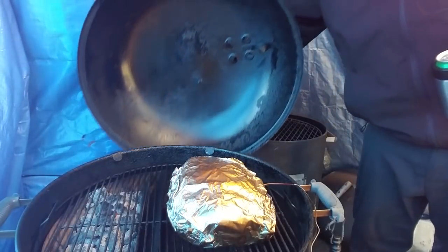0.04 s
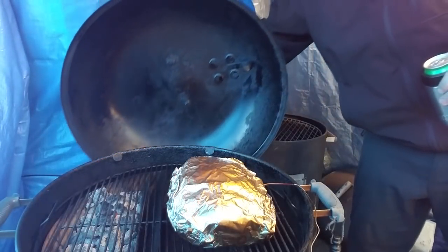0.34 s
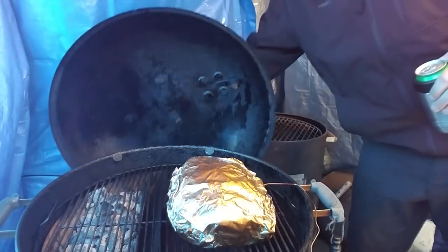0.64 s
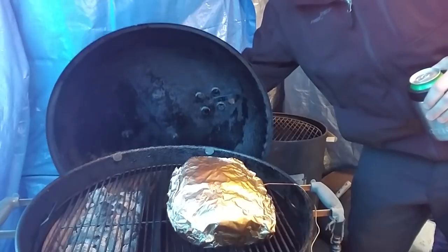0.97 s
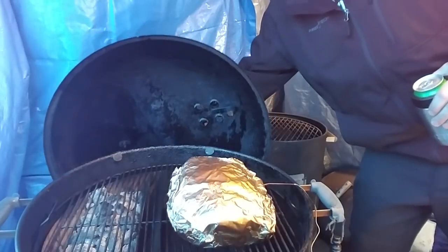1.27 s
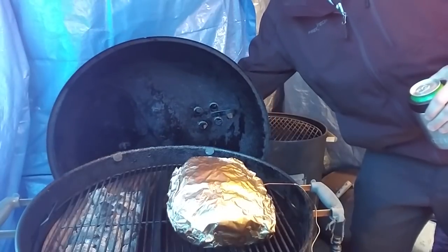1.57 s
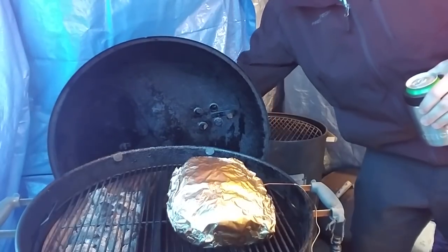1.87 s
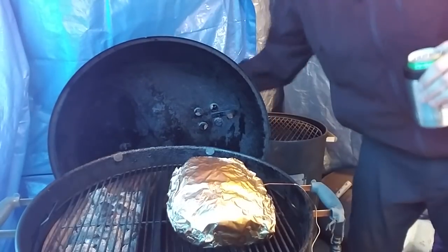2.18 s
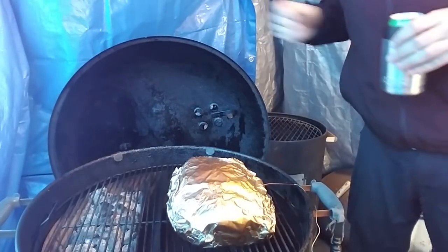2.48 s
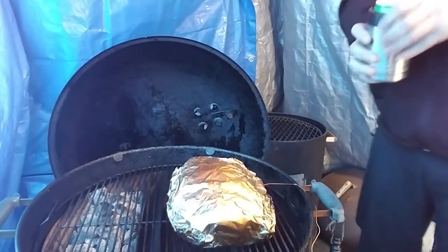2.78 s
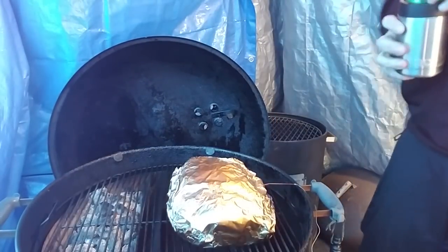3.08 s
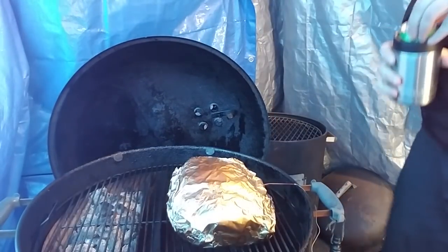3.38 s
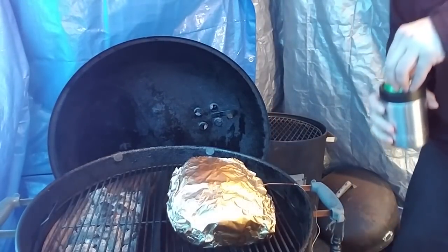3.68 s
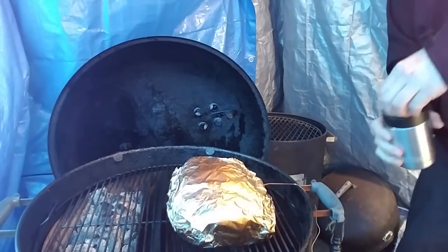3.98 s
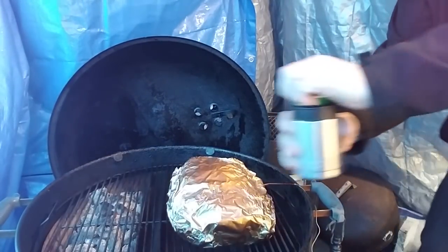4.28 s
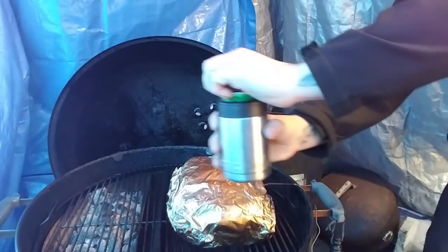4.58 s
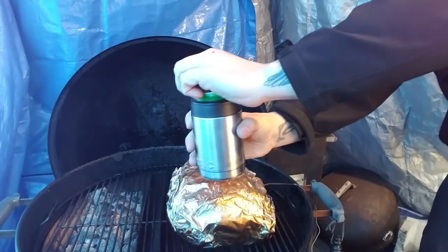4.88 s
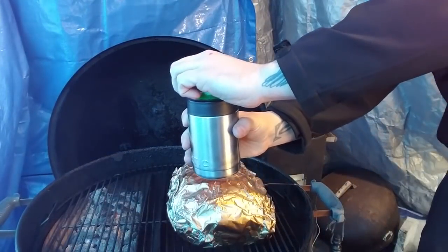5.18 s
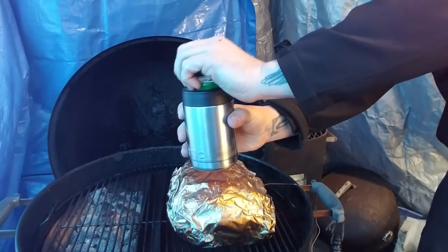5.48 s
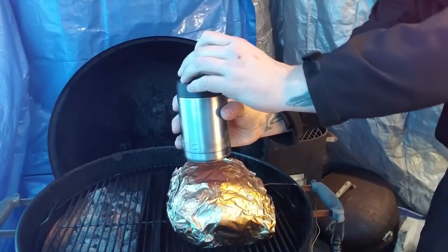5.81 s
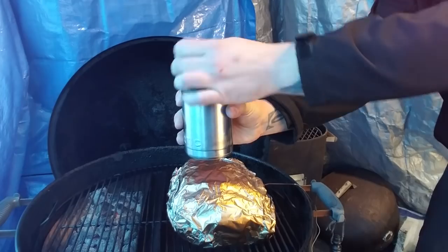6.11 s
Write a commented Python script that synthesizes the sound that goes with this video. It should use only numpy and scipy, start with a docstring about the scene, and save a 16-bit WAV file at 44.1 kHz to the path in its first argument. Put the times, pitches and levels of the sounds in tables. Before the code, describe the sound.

A low, distant outdoor rumble runs quietly throughout. At about 0.2 seconds a steel grill lid touches the rim of its bowl with a light ringing knock. From 0.6 to 1.6 seconds it clanks several times close by, with small rebounds and short metallic rings, the heaviest thump near 1.2 seconds, and settles with a soft knock at 1.9. Jacket sleeves swish softly, most noticeably around 2.5 and from 4 to 4.5 seconds. A tiny squeak comes near 3 seconds, a finger tick on a drink can at 3.4, and a very faint thin squeak just before 5. At 5.1 seconds the can's tab breaks the seal with sharp cracks and a spit of gas, and at 5.25 the flap pops in, the loudest sound. The rumble dips for a moment afterwards, and a few faint finger taps on the can follow until about 6 seconds.

```python
"""Under a tarpaulin shelter, over a low outdoor rumble, a steel kettle-grill lid is hooked onto the
rim of its bowl, knocking and ringing. Jacket sleeves swish as a drink can is brought close, with light
finger ticks and two faint squeaks. About five seconds in, the tab cracks the seal, gas spits out and
the flap pops in. The pop drives a limiter, which ducks the rumble and the last touches for a moment."""
import sys
import numpy as np
from scipy import signal
from scipy.fft import rfft, irfft, next_fast_len
from scipy.io import wavfile
from scipy.ndimage import uniform_filter1d, minimum_filter1d

SR = 44100
rng = np.random.default_rng(int(sys.argv[2]) if len(sys.argv) > 2 else 0)


def wav_out(sig):
    """Save sig, one row per channel (or a flat mono array), as 16-bit PCM at SR to the path in sys.argv[1]."""
    wavfile.write(sys.argv[1], SR, np.round(np.clip(np.atleast_2d(sig).T, -1, 1) * 32767).astype(np.int16))


N = 271170

# The can's aluminium top, damped by the hand. Each row: mode in Hz, level in dB, base t60 in seconds.
CAN_TOP_MODES = [(1100, -9.5, 0.06), (1773, -6.5, 0.048), (2057, -1.5, 0.025), (2390, -0.5, 0.016),
                 (3300, -1.5, .006), (4160, 11.5, 0.0042), (4640, 1.5, 0.0086), (5040, 7, 0.012),
                 (6340, -5, 0.017), (7300, -15, .02), (10400, -12.5, 0.024), (13400, -13.5, 0.011)]
# The colour of rubbing cloth. Each row: frequency in Hz, level in dB.
CLOTH_SPECTRUM = [(200, -11.5), (600, 1), (1300, 0.5), (2800, 1), (4500, -3.5), (7600, -4), (9200, -12.5),
                  (11000, -8), (13500, -4), (15800, -3.5)]
FLAP_IN_S = 5.2494  # the can's flap pops in


def amp(db):
    """Turns dB into gain."""
    return 10 ** (np.asarray(db) / 20)


def unit(x):
    """Scales to rms 1."""
    return x / np.sqrt(np.mean(x ** 2) + 1e-20)


def curve(points, hz):
    """Joins points on a log-frequency axis."""
    f, value = np.transpose(points)
    return np.interp(np.log(hz + 1), np.log(f + 1), value)


def add(mix, s, sound):
    """Mixes a sound in at s seconds."""
    part = mix[:, round(s * SR):][:, :sound.shape[-1]]
    part += sound[..., :part.shape[1]]


def shelf(hz, corner_hz):
    """Goes from 0 below the corner to 1 above it."""
    return hz ** 3 / (hz ** 3 + corner_hz ** 3)


def fade(t, t60):
    """Dies by 60 dB in t60 seconds."""
    return np.exp(-np.log(1000) * t / np.maximum(t60, 1e-3))


def wander(seconds):
    """Smooth random drift of rms 1 that changes over the given time."""
    size = max(int(seconds * SR), 2)
    return unit(uniform_filter1d(uniform_filter1d(rng.standard_normal(N), size), size))


def noise(colour_db, size):
    """Coloured stereo noise of rms 1, centred in the bass and wide above."""
    # Stereo width. Each row: frequency in Hz, left-right correlation.
    correlation = [(60, 0.98), (200, 0.92), (380, 0.693), (700, 0), (1300, 0), (2400, 0.02), (15000, 0)]
    hz = np.fft.rfftfreq(size, 1 / SR)
    left, other = rfft(rng.standard_normal((2, size)))
    shared = curve(correlation, hz)
    right = shared * left + np.sqrt(1 - shared ** 2) * other
    return unit(irfft(np.array([left, right]) * amp(colour_db(hz)), size))


def ring(modes, t, gain_db, decay, scatter):
    """Struck modes: decay scales their ring times, scatter spreads the higher ones' phase in stereo."""
    hz, db, t60 = np.transpose(modes)
    phase = scatter * np.minimum(hz / 1200, 1) * rng.uniform(-np.pi, np.pi, (2, len(modes)))
    waves = fade(t, decay * t60[:, None]) * np.exp(2j * np.pi * hz[:, None] * t)
    return ((amp(db + gain_db) * np.exp(1j * phase)) @ waves).imag


def favour(modes, centre_hz, octaves, depth_db):
    """Gain of each mode in dB: those far from the struck register lose up to depth_db."""
    octaves_off = np.log2((np.array(modes)[:, 0] + 1) / centre_hz)
    return depth_db * (np.exp(-(octaves_off / octaves) ** 2) - 1)


def clusters(hz):
    """Random peaks and gaps in dB: each contact point wakes other clusters of modes."""
    grid_hz = np.arange(0, SR / 2, 48)
    bumps_db = 6 * np.clip(rng.standard_normal(len(grid_hz)), -2.5, 1.1)
    return np.interp(hz, grid_hz, bumps_db) * (.4 + .6 * shelf(hz, 700))


def partials(hz, gap_hz=85.24, width_hz=6.4, height_db=7.5):
    """Narrow peaks in dB at random frequencies: the lid's many short-lived modes."""
    centres = np.cumsum(gap_hz * rng.uniform(.3, 1.7, 600))
    above = np.clip(np.searchsorted(centres, hz), 1, len(centres) - 1)
    off_hz = np.minimum(abs(hz - centres[above - 1]), abs(hz - centres[above]))
    return 10 * np.log10(1 + amp(height_db) ** 2 * np.exp(-(off_hz / width_hz) ** 2))


def outdoors():
    """A bed of distant rumble with a drone at 117 Hz."""
    # The rumble's colour. Each row: frequency in Hz, level in dB.
    spectrum = [(12, -48), (20, -15.5), (49, -8.5), (112, 0), (207, -14.5), (245, -13.5), (478, -12.5),
                (614, -21), (788, -20), (2210, -34), (3080, -39), (3350, -43.5), (7520, -53.5),
                (8880, -53.5), (15500, -40)]
    rumble = noise(lambda f: curve(spectrum, f) - 3 * shelf(f, 4000), N)
    rumble *= amp(-45.5 + .4 * wander(0.053))
    drone = noise(lambda f: -20 * np.log10(1 + ((f - 117) / 11) ** 2), N)
    return rumble + amp(-54.5) * drone


def sleeves():
    """Fine woven cloth slides on itself, catching slightly; each arm movement swells and dies away."""
    # Arm movements. Each row: peak time in seconds, level in dB, rise and fall in seconds.
    swishes = [(.55, -52, .42, 0.3), (1.38, -52, 0.24, 0.58), (2.31, -58, 0.12, 0.3),
               (2.55, -47.5, 0.065, 0.19), (2.9, -60, .2, 0.46), (3.357, -47, 0.024, .04),
               (3.54, -61, 0.088, 0.17), (4.0, -53, 0.12, 0.29), (4.33, -49.5, 0.29, 0.32),
               (5.68, -61.5, 0.16, 0.093), (6.0, -55.5, 0.069, 0.12)]
    t = np.arange(N) / SR
    swells = sum(amp(db) * np.exp(-((t - s) / np.where(t < s, rise, fall)) ** 2)
                 for s, db, rise, fall in swishes)
    stir, catching = amp(-65), amp(0.94 * wander(0.021))
    return (stir + swells) * catching * noise(lambda f: curve(CLOTH_SPECTRUM, f), N)


def squeaks():
    """Faint, thin tones of wavering pitch that swell and fade."""
    # Each row: start and length in seconds, pitch in Hz, level in dB.
    tones = [(2.954, 0.025, 4430, -55.5), (4.6, 0.52, 3145, -69)]
    out = np.zeros((2, N))
    for s, length, hz, db in tones:
        size = int(length * SR)
        cycles = np.cumsum(hz * (1 + 0.0068 * wander(.003)[:size])) / SR
        flutter = amp(3 * wander(0.013)[:size])
        add(out, s, amp(db) * np.sin(2 * np.pi * cycles) * np.hanning(size) * flutter)
    return out


def fingers():
    """Light scuffs with a faint metal ring: nails are bright and sudden, fingertips dull and slow."""
    # Finger scuffs and ticks on the grill lid, then on the can's sleeve and tab.
    # Each row: start in seconds, level in dB, treble in dB.
    touches = [(0.429, -42, -10.5), (0.507, -43.5, 3), (3.364, -33, 4.5), (3.6, -45.5, 21),
               (5.386, -38.5, -15), (5.394, -33.5, 26), (5.411, -35.5, -12), (5.586, -48, -21),
               (5.748, -50, 12), (5.964, -40, -6), (6.032, -47.5, -22), (6.07, -40, 8)]
    out, t = np.zeros((2, N)), np.arange(SR // 3) / SR
    for s, db, treble_db in touches:
        attack_s = 0.0016 * np.exp(-treble_db / 27)
        ring_db = 7 if s > FLAP_IN_S else -6  # the open can rings more
        scuff = noise(lambda f: curve(CLOTH_SPECTRUM, f) + clusters(f) / 2
                      - 5 * shelf(f, 7800) + treble_db * shelf(f, 4000), len(t))
        woken_db = favour(CAN_TOP_MODES, centre_hz=1600, octaves=0.73, depth_db=28)
        tick = ring(CAN_TOP_MODES, t, ring_db + woken_db, decay=1.1, scatter=0.27)
        add(out, s, amp(db) * np.minimum(t / attack_s, 1) * (fade(t, t60=0.13) * scuff + tick))
    return out


def knock(t, registers, bass_db, treble_db, attack_s, decay, ring_db):
    """One contact spreads through the steel shell as a short, dense clang and leaves a few modes singing."""
    # The lid's lasting modes. Each row: frequency in Hz, level in dB, base t60 in seconds.
    lid_modes = [(229.7, 0, 0.9), (383.8, 2, 0.34), (434, -9, 0.61), (625, -9, 1), (904, -11, 0.8),
                 (941, -6.5, 0.45), (967.6, -5, .55), (1112, 6, 0.13), (1238, -5, 0.65), (1417, -2, 0.213),
                 (1466, -1.5, 0.72), (1783, -5, 0.77), (1887, -4.5, 0.55), (1980, 4.5, 0.29),
                 (2010, 1.5, .22), (2110, -9, .25), (2175, -1.5, 0.25), (2260, -6.5, 0.22),
                 (2400, -15, 0.1), (2436, -12.5, 0.5), (2640, -18, 0.3), (2660, -4, 0.4), (2770, -16, 0.5),
                 (3055, 0.5, .19), (3160, 9, 0.17), (3330, 3.5, .12), (3500, -12, .25), (4020, -1, 0.17),
                 (5190, -10, 0.16)]
    # The colour of its crowded short modes. Each row: frequency in Hz, level in dB.
    clang_spectrum = [(53, -26), (90, -9.5), (200, -5), (290, -15), (400, -3.5), (600, -5.5), (800, -9.5),
                      (1300, -12), (1600, -16), (2000, -11.5), (3100, -8.5), (4200, -15), (9400, -31),
                      (15500, -28)]
    # Their tails. Each row: frequency in Hz, base t60 in seconds.
    clang_t60 = [(150, 0.52), (500, 0.21), (1400, 0.29), (3500, 0.24), (8000, 0.28), (15000, 0.19)]
    wash = noise(lambda f: curve(clang_spectrum, f)
                 + 0.87 * clusters(f) + (partials(f) - 3.5) * shelf(f, 430)
                 + bass_db * (1 - shelf(f, 900)) + treble_db * shelf(f, 6400), len(t))
    hz, age, bands = signal.stft(wash, SR, nperseg=256)
    bands *= fade(age, decay * curve(clang_t60, hz)[:, None])
    clang = signal.istft(bands, SR)[1][:, :len(t)]
    woken_db = np.maximum(*(favour(lid_modes, centre, octaves=0.21, depth_db=17) for centre in registers))
    singing = ring(lid_modes, t, ring_db + woken_db, decay, scatter=0.56)
    bloom = np.minimum(t / 0.0079, 1)  # the ring takes a moment to spread round the shell
    return np.minimum(t / attack_s, 1) * clang + bloom * singing


def lid():
    """The lid knocks on the rim, rebounds and thumps; the freer it hangs, the more it sings."""
    # Lid on rim. Each row: start in seconds, level in dB, treble in dB, attack in seconds, freedom from
    # 0 to 1, low and high favoured register in Hz, rebound delay in seconds (0 for none).
    knocks = [(0.153, -29, 14, 0.0021, 0.93, 1934, 2540, 0.012),
              (0.568, -20, 1, 0.0032, 0.17, 434, 3019, 0),
              (0.846, -14.5, 3, 0.0081, 0.077, 2215, 3160, 0.061),
              (1.058, -17.5, -3.5, 0.0069, 0.082, 398, 2410, 0.066),
              (1.179, -21, -1, 0.0092, 0.81, 430, 2350, 0.042),
              (1.238, -17, 7.5, 0.00145, 0.18, 467, 3970, 0.0029),
              (1.251, -16.5, -1, 0.0024, 0.26, 990, 2870, .067),
              (1.544, -18.5, -2, 0.0054, 0.19, 980, 2540, 0.091),
              (1.856, -36.5, -5, 0.005, 0.25, 435, 2150, 0.0048)]
    # Its weight landing. Each row: start in seconds, level in dB, pitch in Hz, rise in seconds.
    thumps = [(0.153, -21, 200, 0.0014), (0.76, -26.5, 154, 0.0013), (1.179, -6, 440, 0.0012),
              (1.239, -20, 469, 0.0039), (1.545, -20, 360, 0.0025), (1.86, -30, 179, 0.0043)]
    held_ring_db, free_ring_db = -8.5, 2.5
    out, t = np.zeros((2, N)), np.arange(36000) / SR
    for s, db, treble_db, attack_s, freedom, *registers, rebound_s in knocks:
        decay = np.interp(freedom, [0, 1], [0.7, 1.31])
        ring_db = np.interp(freedom, [0, 1], [held_ring_db, free_ring_db])
        bass_db = -4.5 - 1.17 * (db + 20.5)  # harder knocks tilt from the bass towards the mids
        add(out, s, amp(db) * knock(t, registers, bass_db, treble_db, attack_s, decay, ring_db))
        if rebound_s > 0:
            rebound = knock(t, registers, bass_db=5, treble_db=7.5, attack_s=0.0018,
                            decay=0.56, ring_db=held_ring_db)
            add(out, s + rebound_s, amp(db - 13.5) * rebound)
    for s, db, hz, rise in thumps:
        envelope = t / rise * np.exp(1 - t / rise)
        add(out, s, -amp(db) * envelope * np.sin(2 * np.pi * hz * t))
    return out


def can():
    """The scored top tears in jerks: each snaps the metal, trailed by spitting gas and near reflections."""
    # The top giving way. Each row: start in seconds, snap level in dB, snap centre in Hz.
    cracks = [(5.1128, -1, 3130), (5.1235, 9.5, 3450), (5.1351, 7, 1792), (5.143, 3, 4500),
              (5.1598, -4.5, 1950), (5.2194, -12.5, 2000), (5.2339, -17.5, 2200), (5.245, -8.5, 2600),
              (5.2492, 16.5, 1700), (5.2514, 10.5, 2200), (5.2618, 10, 2230)]
    # The spray's colour with the flap shut, then open. Each row: frequency in Hz, level in dB.
    shut_spectrum = [(290, -56), (900, -25), (1300, -21), (1730, -6), (2100, -11), (2950, -20), (3900, -12),
                     (4600, -4.5), (5250, -5.5), (5800, -11.5), (6650, -5.5), (7800, -14), (11100, -15.5),
                     (13400, -12), (15500, -19)]
    open_spectrum = [(100, -30), (170, -24.5), (500, -17.5), (850, -15.5), (1050, -7.5), (1400, -14.5),
                     (1750, -7), (2500, -0.5), (3200, -8), (6400, -10), (7400, 0.5), (9200, -17),
                     (11000, -9), (15500, -12)]
    # The can's body and the air above the drink. Each row: mode in Hz, level in dB, base t60 in seconds.
    hollow_modes = [(223, -18, .035), (496, -16.5, .025), (743, -8.5, .04), (1025, -5, 0.051),
                    (1140, -28, .33), (2010, -12.5, 0.066), (2486, -9, .09)]
    swing_s = 0.07
    out, t = np.zeros((2, N)), np.arange(SR // 2) / SR
    trail = np.minimum(t / 0.0015, 1) * (fade(t, t60=0.13) + amp(-34) * fade(t, t60=.3))
    for s, snap_db, centre_hz in cracks:
        opened = 0.97 * np.clip(1 + (s - FLAP_IN_S) / swing_s, 0, 1)
        woken_db = favour(CAN_TOP_MODES, centre_hz, octaves=1.5, depth_db=24)
        snap = ring(CAN_TOP_MODES, t, woken_db, decay=0.48, scatter=0.6)
        snap = snap * (1 - np.exp(-(t / 0.00025) ** 2))  # the tear takes a moment to run
        low_cut_hz = np.interp(opened, [0, 1], [1450, 600])  # the small shut top radiates no bass
        snap = signal.sosfilt(signal.butter(4, low_cut_hz, "high", fs=SR, output="sos"), snap)
        spray = noise(lambda f: (1 - opened) * curve(shut_spectrum, f)
                      + opened * curve(open_spectrum, f), len(t))
        spray_db = -12.5 + .5 * snap_db + 5.5 * opened
        add(out, s, amp(snap_db) * snap / abs(snap).max() + amp(spray_db) * trail * spray)
    add(out, FLAP_IN_S, ring(hollow_modes, t, gain_db=0, decay=0.9, scatter=0.46))
    return out


def pan_bands(x):
    """Each band of a close sound leans a little to one side."""
    # Each row: frequency in Hz, left over right in dB.
    balance = [(60, -2.5), (120, 1.5), (240, -0.5), (480, 4), (950, -1.5), (1890, 1.5), (3770, -1.5),
               (7520, -1.5), (15000, 2.5)]
    size = next_fast_len(N + SR // 10)
    db = curve(balance, np.fft.rfftfreq(size, 1 / SR))
    return irfft(rfft(x, size) * amp(np.array([db, -db]) / 2), size)[:, :N]


def scene():
    """Lid and can up front, with cloth and the outdoors behind them, slightly to the left."""
    bed = (sleeves() + outdoors()) * amp([[.6], [-.6]])
    return bed + pan_bands(lid() + can()) + fingers() + squeaks()


def record(dry):
    """A limiter ducks on peaks, holds, then recovers; overshoots clip, and a low-pass trims the top."""
    threshold_db, hold_s, release_db_per_s, cutoff_hz = -0.5, .66, 50, 15900
    peak = uniform_filter1d(abs(dry).max(0), size=24)
    over_db = np.maximum(20 * np.log10(abs(peak) + 1e-9) - threshold_db, 0)
    half_hold = int(hold_s * SR / 2)
    held_db = -minimum_filter1d(-over_db, 2 * half_hold + 1, origin=half_hold, mode="nearest")
    release_db = release_db_per_s * np.arange(N) / SR
    cut_db = np.maximum.accumulate(held_db + release_db) - release_db
    limited = np.clip(dry * amp(-uniform_filter1d(cut_db, size=24)), -1, 1)
    low_pass = signal.firwin(511, cutoff_hz, window=("kaiser", 9), fs=SR)
    return signal.oaconvolve(limited, low_pass[None], "same")


dry = scene()
out = record(dry)
wav_out(out)
```